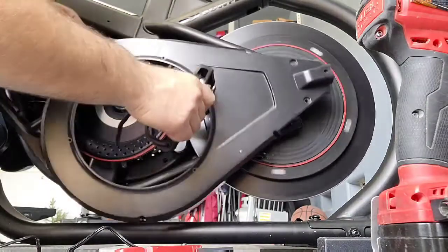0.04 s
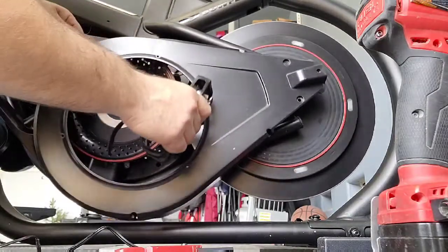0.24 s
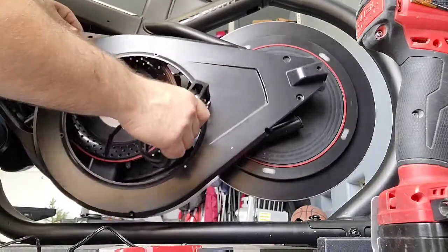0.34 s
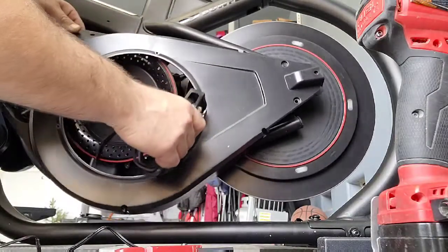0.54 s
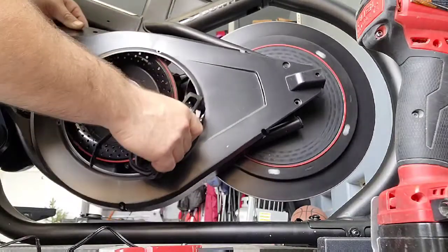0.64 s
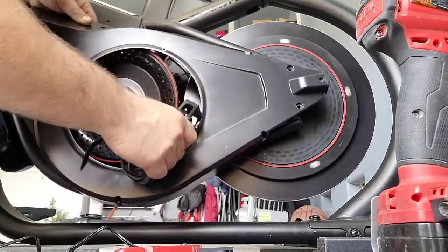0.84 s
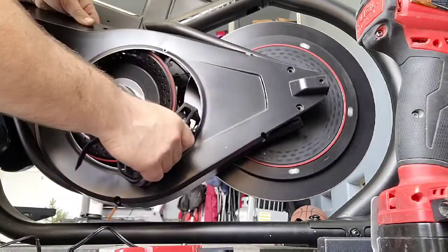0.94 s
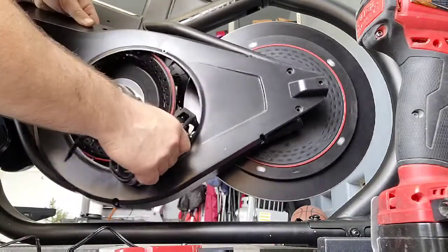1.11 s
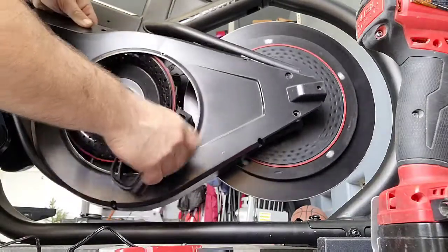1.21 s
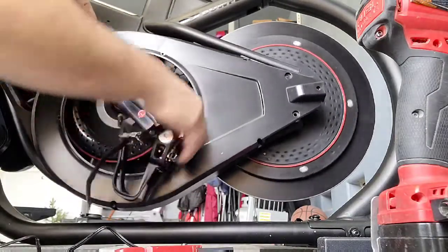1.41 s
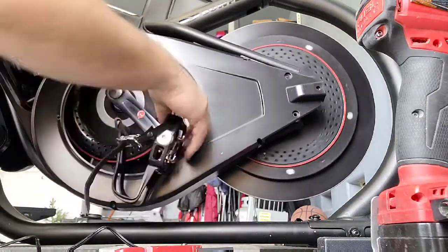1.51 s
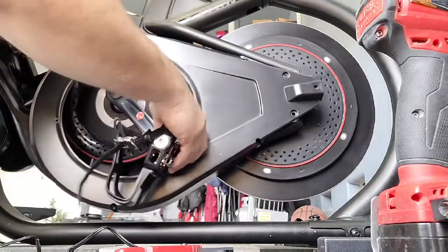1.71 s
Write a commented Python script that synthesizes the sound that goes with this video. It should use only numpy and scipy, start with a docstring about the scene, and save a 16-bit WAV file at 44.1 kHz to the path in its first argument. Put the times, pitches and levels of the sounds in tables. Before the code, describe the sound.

A hollow plastic cover is flexed and pushed onto a machine: a scrape, a loud snapping clatter, a second sharp knock, softer taps, then another rattling burst, close to a phone in a small room.

```python
"""Small room, close to a phone: a hard plastic cover is flexed and pushed onto a machine frame.
Knocks ring the decaying modes of the hollow shell and add noise cracks in the treble.
Its edge scrapes as random grains through the same modes plus hiss, and squeaks twice as wavering tones.
Dull thumps ring two low frame modes; steady room noise and a low hum lie under it."""
import sys
import numpy as np
from scipy import signal
from scipy.fft import rfft, irfft
from scipy.io import wavfile
from scipy.ndimage import uniform_filter1d

SR = 44100
rng = np.random.default_rng(int(sys.argv[2]) if len(sys.argv) > 2 else 0)


def persist_wave(psi):
    """Save psi, clipped to +-1, as 16-bit WAV."""
    counts = np.round(np.clip(psi, -1, 1) * 32767).astype(np.int16)
    wavfile.write(sys.argv[1], SR, np.atleast_2d(counts).T)


N = 77175


def undb(db):
    """Amplitude ratio of a level in dB."""
    return 10 ** (np.asarray(db) / 20)


def level(x, db):
    """Set the RMS level."""
    return x * undb(db) / np.sqrt(np.mean(x ** 2))


def fade(t60_s, size):
    """Exponential decay, 60 dB in t60_s."""
    return np.exp(-np.log(1000) * np.arange(size) / (t60_s * SR))


def ring(x, hz, t60_s):
    """One decaying mode driven by x: a complex one-pole resonator."""
    pole = np.exp(2j * np.pi * hz / SR - np.log(1000) / (t60_s * SR))
    return signal.lfilter([1], [1, -pole], x).imag


def colour(x, table):
    """Filter x by (frequency [Hz], gain [dB]) points, linear in log frequency."""
    hz, db = np.array(table).T
    f = np.maximum(np.arange(len(x) // 2 + 1) * SR / len(x), 1)
    gain = undb(np.interp(np.log(f), np.log(hz), db))
    return irfft(rfft(x) * gain, len(x))


def train(times_s, gains):
    """Impulses at the given times."""
    return np.bincount((times_s * SR).astype(int), gains, N)[:N]


def wander(rate_hz):
    """Twice-smoothed noise of RMS 1."""
    width = int(SR / rate_hz)
    once = uniform_filter1d(rng.standard_normal(N), width)
    return level(uniform_filter1d(once, width), 0)


# room noise spectrum: (frequency [Hz], relative density [dB per Hz])
FLOOR_SPECTRUM = [(25, 8), (60, 3), (150, 3), (300, -3), (600, -10), (1100, -5.5), (2200, -38),
                  (2800, -38.5), (8000, -44.5), (16000, -49)]
# hum bands: (frequency [Hz], width [Hz], level [dB])
HUM_BANDS = [(65.6, 50, -66.5)]
FLOOR_DB, FLOOR_SWAY_DB = -53, 1.2  # level before sway, RMS sway


def background():
    """Coloured room noise with a slow sway, plus narrow-band noise as a wavering low hum."""
    hush = level(colour(rng.standard_normal(N), FLOOR_SPECTRUM), FLOOR_DB)
    out = hush * undb(FLOOR_SWAY_DB * wander(4))
    for hz, width_hz, db in HUM_BANDS:
        t60_s = np.log(1000) / (np.pi * width_hz)
        out = out + level(ring(rng.standard_normal(N), hz, t60_s), db)
    return out


# frame thumps: (time [s], low mode drive [dB], high mode drive [dB])
FRAME_THUMPS = [(0.243, -39, -31.5), (0.288, -50, -30), (0.386, -47, -34.5), (.585, -44.5, -50),
                (0.801, -45, -53), (.985, -62, -50.5), (1.196, -47.5, -49.5), (1.4, -41, -34.5),
                (1.49, -51, -37.5), (1.547, -53, -66)]
# frame modes, low and high: (frequency [Hz])
FRAME_MODES_HZ = [68, 118]
THUMP_T60_S, THUMP_PUSH_S = 0.33, 0.0077


def thumps():
    """Slow pushes ring the two low modes of the frame."""
    times_s, *drives_db = np.array(FRAME_THUMPS).T
    push = np.hanning(int(THUMP_PUSH_S * SR))
    push = push / push.sum()
    out = np.zeros(N)
    for hz, db in zip(FRAME_MODES_HZ, drives_db):
        pushes = signal.lfilter(push, 1, train(times_s, undb(db)))
        out += ring(pushes, hz, THUMP_T60_S)
    return out


# squeaks: (start [s], length [s], mean pitch [Hz], level before break-up [dB], overtones re fundamental [dB])
SQUEAK_EVENTS = [(0.102, 0.12, 1847, -56, -9), (1.373, 0.05, 1906, -37, -31)]
SQUEAK_WOBBLE, SQUEAK_PATCHY_DB = 0.021, 6  # RMS: pitch fraction, level


def squeaks(t):
    """Short rubbing tones with a wavering pitch and a level that breaks up."""
    out = np.zeros(N)
    wobble = 1 + SQUEAK_WOBBLE * wander(340)
    for start_s, length_s, hz, db, over_db in SQUEAK_EVENTS:
        phase = 2 * np.pi * np.cumsum(hz * wobble) / SR
        overtones = np.sin(2 * phase) + 0.94 * np.sin(4 * phase)
        tone = np.sin(phase) + undb(over_db) * overtones
        swell = np.sin(np.pi * np.clip((t - start_s) / length_s, 0, 1))
        out += undb(db + SQUEAK_PATCHY_DB * wander(320)) * swell * tone
    return out


SHELL_LOW_HZ, SHELL_TOP_HZ = 190.6, 2580


def radiate(x):
    """The shell sends out little below and above its main range."""
    band_hz = [SHELL_LOW_HZ, SHELL_TOP_HZ]
    return signal.sosfilt(signal.butter(3, band_hz, "bandpass", fs=SR, output="sos"), x)


AIR_HZ = 8300


def air(x, db):
    """Raise or lower everything above AIR_HZ."""
    low = signal.sosfilt(signal.butter(6, AIR_HZ, "lowpass", fs=SR, output="sos"), x)
    high = signal.sosfilt(signal.butter(6, AIR_HZ, "highpass", fs=SR, output="sos"), x)
    return low + undb(db) * high


# shell modes, also rung by knocks(): (nominal frequency [Hz], relative level [dB], t60 [s])
SHELL_MODES = [(228.3, -11, 0.03), (301.6, -18, 0.17), (364.4, -8.5, 0.1), (481.1, -3, 0.056),
               (538, -4, 0.054), (606.2, -1.5, 0.07), (673.4, -5.5, 0.11), (772, -2.5, 0.055),
               (853, -3.5, 0.05), (948, 3, 0.023), (1033.3, -6, 0.077), (1087.2, -5.5, 0.072),
               (1452.5, -8.5, 0.05), (1658, -9, 0.065), (1903, -3, 0.028), (2180, -10, 0.057)]
# sliding of the edge: (time [s], body level [dB], hiss re body [dB])
SCRAPE_PATH = [(0, -51.5, -17), (0.059, -68.5, -5.5), (0.119, -48, -13), (0.188, -41, -8.5),
               (0.211, -47, -13), (0.298, -46.5, -9.5), (.37, -41, -24), (0.448, -52, -11.5),
               (.54, -68, -12), (0.619, -44.5, -19), (0.718, -52, -25), (.85, -61, -22), (.95, -62.5, -36),
               (1.029, -67.5, -15), (1.06, -60.5, -15.5), (1.11, -59, -20), (1.16, -42.5, -29.5),
               (1.24, -44.5, -37), (1.315, -54.5, -42), (1.345, -51.5, -18), (1.381, -44.5, -18),
               (1.421, -42, -22), (1.47, -48.5, -9.5), (1.529, -49, -12), (1.62, -69.5, -10),
               (1.75, -86, -31)]
# hiss spectrum of the edge: (frequency [Hz], relative density [dB per Hz])
RUB_SPECTRUM = [(1200, -4), (2300, 1.5), (3500, -4.5), (7600, -6.5), (8700, -10), (16000, -20)]
GRAINS_PER_S, GRAIN_SCATTER_DB = 3000, 4
RUB_FLICKER_DB = 2.7  # RMS
RUB_AIR_DB_PER_DB, RUB_BRIGHT_DB = 2.5, -10  # brighter rub, more air; neutral point


def scrape(t):
    """Dense stick-slip grains ring the shell, and the edge hisses."""
    times_s, body_db, treble_db = np.array(SCRAPE_PATH).T
    body_db, treble_db = np.interp(t, times_s, body_db), np.interp(t, times_s, treble_db)
    sign_noise, size_noise, hiss_noise = rng.standard_normal((3, N))
    hits = rng.random(N) < GRAINS_PER_S / SR
    grains = hits * np.sign(sign_noise) * undb(GRAIN_SCATTER_DB * size_noise)
    modes = sum(undb(db) * ring(grains, hz, t60_s) for hz, db, t60_s in SHELL_MODES)
    body = level(radiate(modes), 0)
    hiss = level(colour(hiss_noise, RUB_SPECTRUM), 0) * undb(RUB_FLICKER_DB * wander(110))
    hiss = air(hiss, RUB_AIR_DB_PER_DB * (treble_db - RUB_BRIGHT_DB))
    return undb(body_db) * (body + undb(treble_db) * hiss)


# knocks: (time [s], nominal peak [dB], favoured pitch [Hz],
#          low modes [dB], upper modes [dB], treble crack [dB]), last three re peak
KNOCK_EVENTS = [(0.008, -23, 830, 2, -1.5, -9), (0.194, -31.5, 610, 14, 13, -12),
                (0.213, -25.5, 850, 8, 4, -30), (0.231, -15.5, 933, -1.5, 5, -3.5),
                (0.238, -7, 659, 1.5, 2, -13), (0.25, -20.5, 600, 1, 11, -4),
                (0.259, -19.5, 613, 7, 2, -21), (0.265, -14, 990, 8, 0.5, -20),
                (0.275, -15, 1080, 6, -1, -23), (0.281, -20, 604, -18, -14, -18),
                (0.302, -30.5, 530, 11.5, 10, -24), (0.324, -32.5, 580, 14.5, 11, -5),
                (0.33, -21.5, 534, 6, -1.5, -14.5), (0.342, -29.5, 907, 5, 1, -9),
                (0.351, -23, 710, 15.5, 1.5, -28), (0.386, -26.5, 1060, 15.5, 7.5, -3.5),
                (0.397, -25, 990, 7.5, 2.5, -7.5), (0.416, -25, 700, 11.5, -4, -11.5),
                (0.545, -38.5, 890, 5, 5.5, -8.5), (0.5806, -15.5, 1100, -2, -1, -12),
                (0.588, -17, 1096, -3, 4, -35), (0.597, -19, 682, -17.5, -2.5, -20.5),
                (0.603, -25.5, 1050, 11, -12, -11.5), (0.61, -25.5, 670, 1.5, -31, -37),
                (0.656, -35, 746, 19, 6, -7), (0.766, -41, 596, 11.5, -9, -19.5),
                (0.791, -29.5, 509, 2, 5.5, -21), (0.986, -28.5, 626, 6.5, -2.5, -33.5),
                (1.019, -42, 606, 13.5, 0, -29), (1.062, -38.5, 1120, -12.5, 1.5, -20),
                (1.131, -36.5, 510, 13.5, 7.5, -18), (1.171, -23.5, 988, 8.5, -27, -29),
                (1.187, -21, 1030, 6.5, 12.5, -13.5), (1.19, -15.5, 1002, 1.5, 3, -39),
                (1.203, -19, 1045, 0.5, -16, -32), (1.221, -29, 652, -13, -20, -38),
                (1.395, -21.5, 685, 1.5, 2, -10.5), (1.401, -24, 734, -21, 7, -6),
                (1.407, -23.5, 950, -20, 8.5, -8.5), (1.412, -28, 930, 7, 16, -18),
                (1.421, -32.5, 735, 7, 9, -5), (1.433, -19, 633, 3, 3, -9.5),
                (1.439, -22, 620, -19, 11.5, -3), (1.446, -24.5, 620, -5, -3, -14),
                (1.474, -35, 620, -8, -18, -24), (1.491, -27.5, 623, 11.5, 1, -4),
                (1.499, -34.5, 595, 3, 18.5, -13), (1.546, -25.5, 1100, 2, 2, -24),
                (1.576, -33, 596, -2.5, -6.5, -19.5), (1.702, -41.5, 638, -2, 2, -15.5),
                (1.728, -45, 1100, -1, -14, -7.5)]
# mode group limits, low / middle / upper: (frequency [Hz])
MODE_GROUP_EDGES_HZ = [480, 1280]
# crack spectrum: (frequency [Hz], relative density [dB per Hz])
CRACK_SPECTRUM = [(1200, 0.5), (2300, -4), (3000, -5.5), (4800, -13), (6000, -18.5), (7600, -10),
                  (8700, -33.5), (16000, -40)]
PARTIALS = 3  # close partials per mode
DETUNE, MODE_SCATTER_DB = 0.022, 2  # RMS per partial: pitch fraction, level
SHELL_DB = -17.5  # common mode gain
FAVOUR_DB, FAVOUR_OCTAVES = 11.5, 0.092  # boost of modes near the favoured pitch
QUICK_T60_S, QUICK_DB = 0.0072, -4.5  # extra first instant
RISE_S, SOFTENING = 0.00044, 0.42  # rise constant at 0 dB peak; dB of rise time per dB under it
CRACK_T60_S, CRACK_DB = 0.055, 9.5
AIR_DB_PER_DB, HARD_DB = 1, -12  # brighter crack, more air; neutral point


def knocks():
    """Every knock rings the flexed shell a little differently and cracks in the treble."""
    t = np.arange(SR // 5) / SR
    hz, mode_db, t60_s = np.repeat(SHELL_MODES, PARTIALS, axis=0).T[:, :, None]
    group = np.searchsorted(MODE_GROUP_EDGES_HZ, hz)
    slow = np.exp(-np.log(1000) * t / t60_s)
    quick = undb(QUICK_DB) * fade(QUICK_T60_S, len(t))
    burst = fade(CRACK_T60_S, len(t))
    shell, crack = np.zeros(N + len(t)), np.zeros(N + len(t))
    for time_s, peak_db, pitch_hz, low_db, upper_db, treble_db in KNOCK_EVENTS:
        level_noise, tune_noise, sign_noise = rng.standard_normal((3, len(hz), 1))
        start = int(time_s * SR)
        rise = 1 - np.exp(-t / (RISE_S * undb(-SOFTENING * peak_db)))

        # each mode swings either way; the first instant pushes all alike
        swing = np.repeat(np.sign(sign_noise[::PARTIALS]), PARTIALS, axis=0)
        decay = swing * slow + quick
        favour_db = FAVOUR_DB * np.exp(-(np.log2(hz / pitch_hz) / FAVOUR_OCTAVES) ** 2)
        group_db = np.array([low_db, 0, upper_db])[group]
        scatter_db = MODE_SCATTER_DB * level_noise
        gains = undb(SHELL_DB + mode_db + peak_db + group_db + favour_db + scatter_db)
        tones = np.sin(2 * np.pi * hz * (1 + DETUNE * tune_noise) * t)
        shell[start:][:len(t)] += rise * np.sum(gains * decay * tones, axis=0)

        hiss = rng.standard_normal(len(t)) * burst * rise
        hiss = air(hiss, AIR_DB_PER_DB * (treble_db - HARD_DB))
        crack[start:][:len(t)] += hiss * undb(CRACK_DB + peak_db + treble_db)
    return radiate(shell[:N]) + colour(crack[:N], CRACK_SPECTRUM)


ROOM_T60_S, ROOM_DELAY_S, ROOM_DB, ROOM_DULL_HZ = 0.26, 0.006, -15.5, 2390


def reverberate(near):
    """Room tail: convolution with delayed, decaying, dulled noise of unit energy."""
    late = np.arange(SR) > ROOM_DELAY_S * SR
    tail = rng.standard_normal(SR) * fade(ROOM_T60_S, SR) * late
    tail = signal.lfilter(*signal.butter(1, ROOM_DULL_HZ, fs=SR), tail)
    return undb(ROOM_DB) * signal.fftconvolve(near, tail / np.sqrt(np.sum(tail ** 2)))[:N]


def scene():
    """Sum the near sources, their room tail and the background; one channel."""
    t = np.arange(N) / SR
    near = thumps() + squeaks(t) + scrape(t) + knocks()
    return (background() + near + reverberate(near))[None]


MIC_LOW_HZ, TOP_HZ = 44.7, 15900


def record(dry):
    """The phone cuts the deepest bass and the top."""
    thin = signal.sosfilt(signal.butter(2, MIC_LOW_HZ, "highpass", fs=SR, output="sos"), dry)
    return signal.sosfilt(signal.ellip(10, 0.2, 70, TOP_HZ, fs=SR, output="sos"), thin)


dry = scene()
out = record(dry)
persist_wave(out)
```